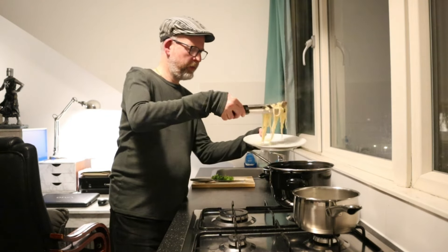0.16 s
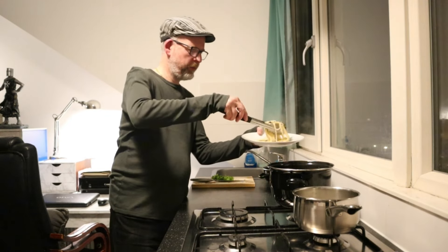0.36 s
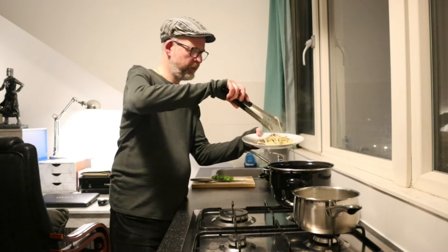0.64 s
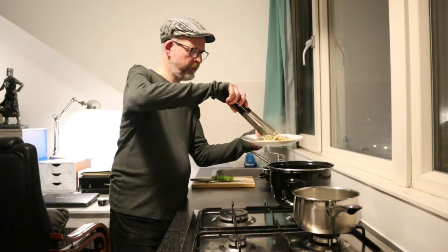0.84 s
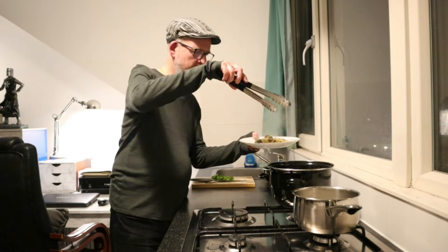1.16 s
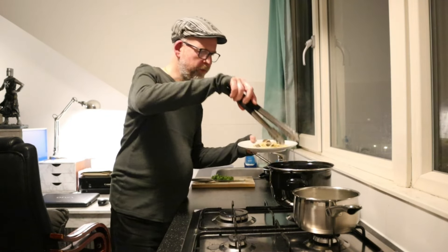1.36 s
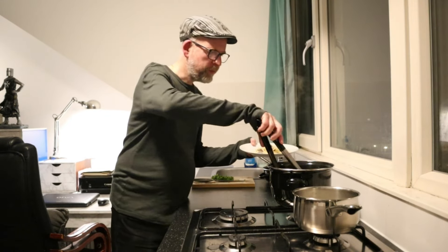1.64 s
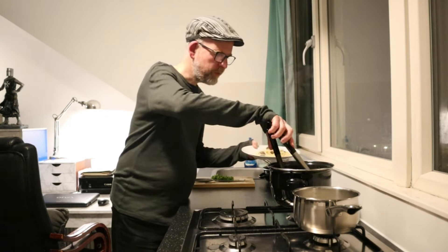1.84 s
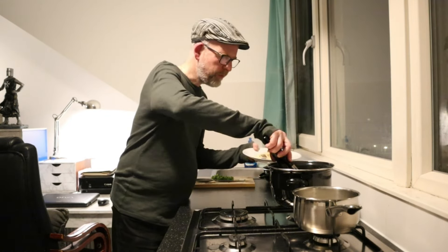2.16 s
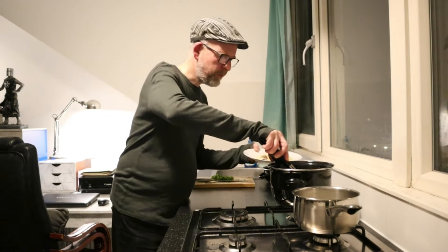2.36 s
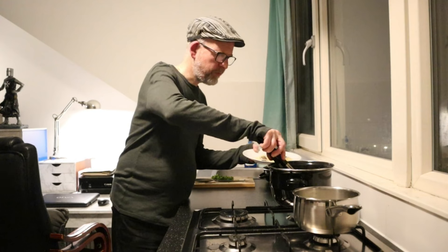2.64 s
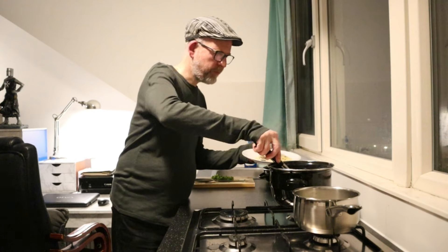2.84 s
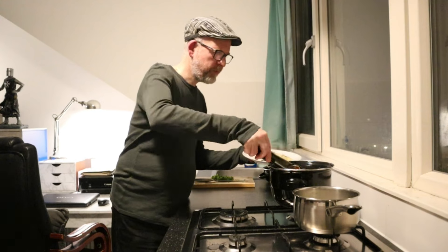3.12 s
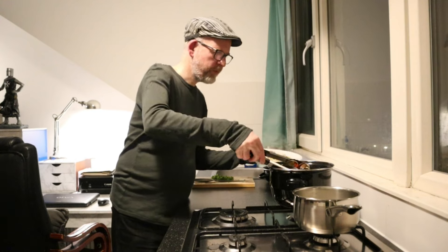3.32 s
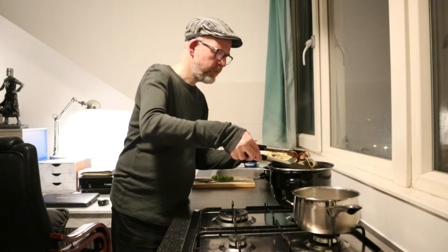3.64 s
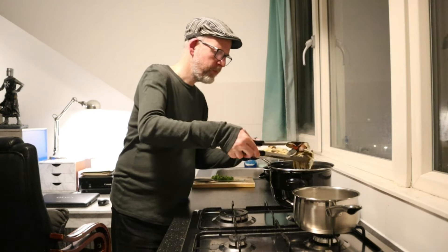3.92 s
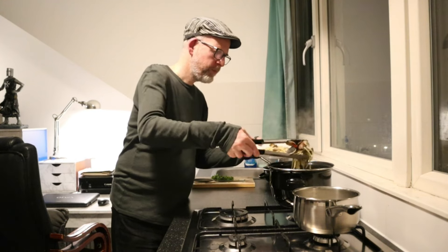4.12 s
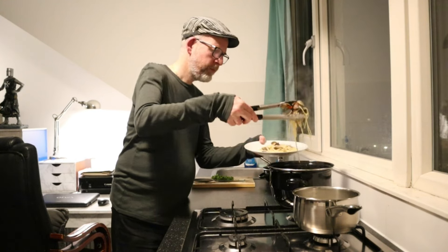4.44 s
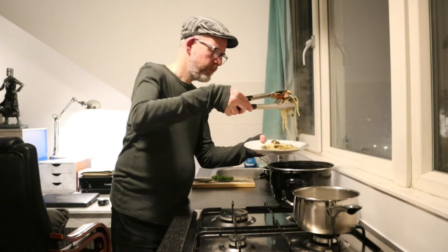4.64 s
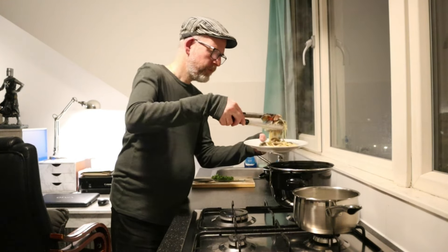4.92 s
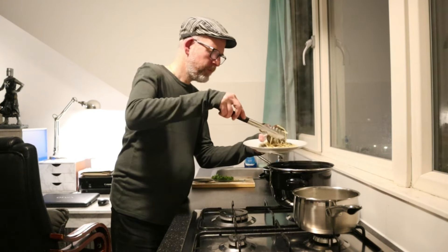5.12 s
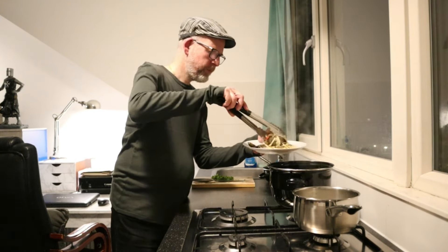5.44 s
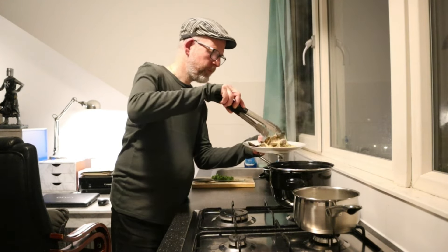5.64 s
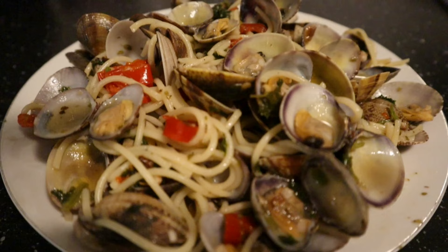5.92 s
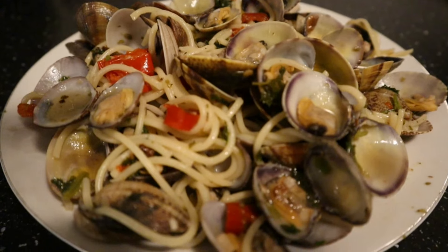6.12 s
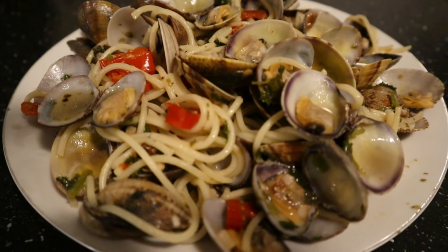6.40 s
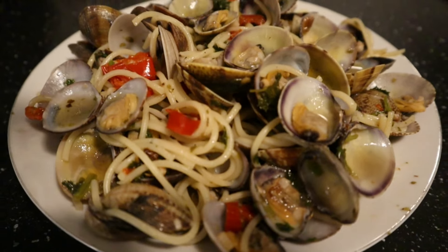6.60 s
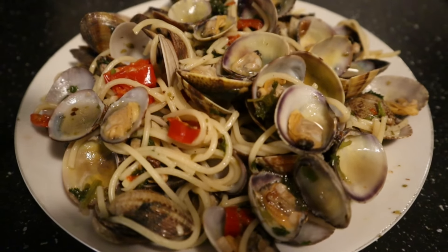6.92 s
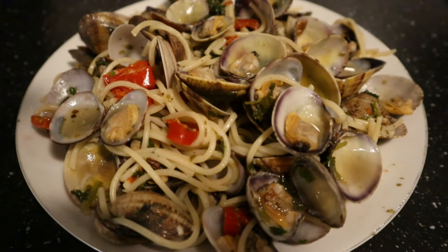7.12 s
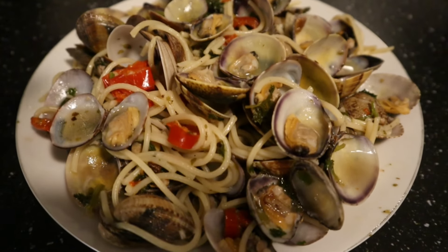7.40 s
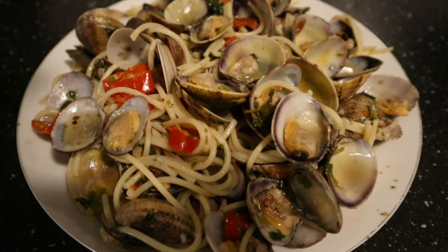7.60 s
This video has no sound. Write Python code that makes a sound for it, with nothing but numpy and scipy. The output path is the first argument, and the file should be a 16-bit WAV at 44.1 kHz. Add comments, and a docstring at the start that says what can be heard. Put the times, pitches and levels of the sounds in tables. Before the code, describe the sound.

In a small live kitchen, tongs and clam shells clink, rattle and scrape between pan and plate, then abruptly only low rumble and a faint whistle.

```python
"""Pasta with clams is served from a pan onto a china plate with steel tongs, in a small kitchen.
First a faint drag and knocks on the plate: struck modes of china and steel, with a noisy crack.
Then jabs into the pan, clacking shells and stirring: short bursts of banded noise, modes and random slips.
A second helping drops and drags on the plate; a limiter ducks the loudest knocks.
After a short silence: low hum and rumble from sines and noise, and one faint, thin, wavering whistle."""
import sys
import numpy as np
from scipy import signal
from scipy.io import wavfile
from scipy.ndimage import uniform_filter1d

SR = 44100
rng = np.random.default_rng(int(sys.argv[2]) if len(sys.argv) > 2 else 0)


def store_pcm(level_fs):
    """Save levels as 16-bit WAV."""
    pcm = np.round(np.clip(level_fs, -1, 1) * 32767).astype(np.int16)
    wavfile.write(sys.argv[1], SR, np.atleast_2d(pcm).T)


N = 341951

# All dB of the serving are relative, ahead of its overall gain, the room and the limiter.
# Tongs and shells knock on the plate. Each row: start in seconds, plate level in dB, place (0 rim, 1 well),
# contact cut-off in Hz, tongs ring in dB, crack in dB.
PLATE_KNOCKS = [(0.491, -24.5, .3, 6000, -52, -25.5), (0.5109, 7.5, 0.18, 9350, -18, -6),
                (0.6959, 8.5, 0.91, 5500, -45, -35), (0.71, -6, 0.68, 3930, -44, -38),
                (0.9149, 9, 0.43, 9500, -12, 4.5), (5.353, -12.5, 0.1, 3020, -22, -13.5),
                (5.3779, -28, 0.1, 9000, -5.5, 0), (5.389, -6, 1, 9000, -13, 6),
                (5.62, -2, 0.89, 8000, -35, -0.5), (5.7382, -11.5, 1, 5030, -23, -7),
                (5.753, -7.5, 0.63, 3000, -16, -9), (5.7652, -13, 0.61, 8000, -25, -3.5),
                (5.849, -14.5, 0.1, 8000, -9.5, -5)]
# Single loud shell clacks. Each row: start in seconds, level in dB, pitch centre in Hz, lift there in dB,
# pan knock in dB.
SHELL_CLACKS = [(1.697, -9.5, 5440, 6, -15), (1.964, -19, 5230, -1, -30), (1.9871, -17, 4820, 0.5, -22),
                (2.029, -17.5, 2220, 14, -19), (2.068, -14.5, 2970, 7, -16), (2.132, -6, 2900, 6.5, -2),
                (2.2162, -12.5, 3100, 2, -35), (2.346, -16, 3370, 3, -15.5), (2.428, -18, 3850, 7, -22),
                (2.6102, -17, 5700, 4.5, -43), (2.671, -21, 5960, 5, -25.5), (2.737, -20.5, 8000, 0, -24),
                (2.877, -17.5, 6200, 1, -48), (2.995, -20, 5600, -11, -52), (3.099, -22.5, 8000, 5, -53),
                (3.201, -21, 7340, 4.5, -58), (3.337, -21.5, 5700, 12.5, -35),
                (3.4035, -10, 990, 18.5, -19), (3.485, -18, 7240, 9, -16), (3.5, -11.5, 6540, 6.5, -20),
                (3.933, -9.5, 6960, 9, -16.5), (4.0481, -28, 6740, 17.5, -28),
                (4.109, -29, 5730, 14, -32.5), (5.017, -30.5, 4100, 6.5, -68), (5.039, -13, 5000, 11, -50),
                (5.0688, -12.5, 3530, 8, -53), (5.2209, -19, 4730, 7.5, -49), (5.2736, -17, 4080, 4.5, -53)]
# Tongs jab into the pan and set shells tumbling. Each row: start in seconds, level in dB, pan knock in dB,
# first gap in seconds.
JABS = [(1.6883, -1, -15, 0.011), (2.1099, -1.5, -21, .0086), (2.454, -2, -14, 0.0084)]
# Steel tips of the tongs snap together. Each row: start in seconds, level in dB.
TIP_SNAPS = [(2.131, -8.5), (3.499, -7), (3.552, -20), (3.9345, -10), (4.113, -18.5), (5.07, -11.5)]
# Tongs tap the rim of the pan. Each row: start in seconds, level in dB.
RIM_TAPS = [(3.498, -6.5), (4.111, -30)]
# Shells grind with a squeal. Each row: start in seconds, end in seconds, level in dB, centre in Hz, width in Hz.
SQUEALS = [(1.975, 2.03, -22, 5100, 500), (2.02, 2.096, -21.5, 2240, 900), (2.945, 3.052, -30, 5700, 800),
           (3.497, 3.524, -21, 5400, 1400), (5.068, 5.115, -11.5, 3430, 1440),
           (5.58, 5.621, -16.5, 6100, 2450), (5.641, 5.687, -24.5, 2000, 547)]
# Effort of the stirring. Each row: time in seconds, effort in dB (only its course counts, not its mean).
STIR_EFFORT = [(1.97, -30), (2.042, -22), (2.154, -27.5), (2.426, -30), (2.734, -33.5), (2.906, -30),
               (3.488, -28.5), (3.52, -34.5)]
# Tongs scrape the floor of the pan. Each row: start in seconds, end in seconds, level at the end in dB.
PAN_SCRAPES = [(2.046, 2.124, -21), (2.682, 2.72, -34), (3.414, 3.512, -34), (3.95, 3.977, -34.5)]
# Tongs drag food over the plate. Each row: start in seconds, end in seconds, level at the end in dB.
PLATE_DRAGS = [(0.016, 0.494, -51), (5.087, 5.102, -16.5), (5.288, 5.448, -21), (5.563, 5.586, -13.5),
               (5.745, 5.778, -39)]
# Faint, thin whistle. Each row: time in seconds, pitch in Hz, level in dB.
WHISTLE = [(6.15, 5134, -69), (6.172, 5368, -48), (6.206, 5490, -45), (6.216, 5600, -56),
           (6.296, 5604, -54), (6.366, 5330, -49), (6.486, 5394, -49.5), (6.62, 5066, -66)]

# Modes of the plate, damped by the food. Each row: pitch in Hz, dB struck at the rim, dB struck in the well,
# t60 in seconds.
PLATE_MODES = [(377, -32.5, -38, .12), (1798, -2, -14, 0.046), (1958, -5, -10.5, 0.032),
               (2744, -5, -10.5, 0.01), (2835, -4, -11.5, 0.035), (3726, -12.5, -16.5, 0.021),
               (4052, -9, -9, 0.044), (4888, -4, -17.5, 0.062), (5670, -52.5, -9.5, 0.097),
               (6184, -4, -14, 0.017), (7460, -39, -12, 0.028), (8000, -19, -23, 0.12),
               (10300, -18.5, -37, 0.34), (12600, -18, -31, .06)]
# Modes of steel tongs, pan and pan rim. Each row: pitch in Hz, level in dB, t60 in seconds.
TONGS_MODES = [(1320, -18, 0.11), (2710, -9.5, 0.17), (3430, -8, 0.1), (4220, -13.5, 0.23),
               (4750, -18, 0.077), (5640, -11, 0.29), (6100, -14, 0.64), (7370, -8, 0.073),
               (7800, -3.5, 0.054), (8500, -4, 0.12), (10600, -29, .1), (10700, -14, 0.21),
               (11820, -12.5, 0.15), (13750, -18, 0.23)]
PAN_MODES = [(170, -18, 0.31), (271, -17.5, 0.42), (341, -22, 0.071), (485, 0, 0.032), (569.4, -11, 0.27),
             (740, -11, 0.036), (907, -17, 0.43), (970, -19.5, 0.044), (1302, -12, 0.17)]
RIM_MODES = [(4810, -4, 0.11), (5160, -2, .1), (5297, 6.5, 0.067), (5696, -1, .12), (6100, -8, 0.15)]

# Spectra of shell, crack on the plate, tip snap, dull pan knock, kitchen air and rumble.
# Each row: frequency in Hz, density in dB per Hz (relative).
SHELL_SPECTRUM = [(100, -22), (300, -24), (600, -17), (1200, -12.5), (2000, -1.5), (3200, -2.5), (5500, 0),
                  (8500, -5.5), (11000, -22), (15500, -13.5)]
CRACK_SPECTRUM = [(50, -22), (200, -30), (400, -11.5), (1200, 4), (2000, 6), (5000, 18.5), (8000, 15.5),
                  (11000, 2.5), (15500, 6)]
TIP_SPECTRUM = [(500, -19), (3000, -2), (6500, 10), (9000, 12), (11500, -5), (13500, -6), (14800, 6),
                (16000, -10)]
THUD_SPECTRUM = [(30, -31), (70, 0), (120, -17), (180, -0.5), (290, -10), (430, 2.5), (650, -6.5),
                 (1100, -4), (2000, -46), (5000, -48)]
AIR_SPECTRUM = [(15, -41), (25, -16), (79, -2), (221, -9), (274, -24), (399, -6.5), (509, -16.5),
                (1900, -20), (2170, -22), (3000, -22.5), (4620, -21.5), (6730, -25), (15500, -30.5)]
RUMBLE_SPECTRUM = [(12, -29), (20, 6), (33, -4), (119, -21.5), (161, -20), (196, -22.5), (382, -22.5),
                   (439, -25), (705, -28), (1270, -32), (2330, -35.5), (4680, -39.5), (15500, -42.5)]
# Swell of the air noise. Each row: time in seconds, gain in dB.
AIR_SWELL = [(0, 5), (.5, 5), (1, 1.5), (4.5, 0), (5, 2), (5.9, -1)]
# Hum tones. Each row: pitch in Hz, rms level in dB.
HUM = [(48.4, -60), (84, -55), (158, -49)]
# Decay of the room. Each row: frequency in Hz, t60 in seconds.
ROOM_T60 = [(100, 0.21), (500, 0.43), (2000, 0.55), (5000, 0.42), (9000, 0.32), (15000, 0.14)]

SERVING_GAIN_DB, AIR_DB, RUMBLE_DB = -5.0, -50, -35.5
BREAK_START_S, BREAK_END_S = 5.933, 5.965
LIMITER_ATTACK_S, CUTOFF_HZ = .012, 15750
MODE_SCATTER_DB = 2.0
TUMBLE_GAP_GROWTH, TUMBLE_LOSS_DB = 1.85, 2.4  # per touch
STIR_MEAN_DB, STIR_FOLLOWS = -30, 1.33  # rattle dB per dB of effort
LOOSE_PER_S, LOOSE_DB = 40, -7.5
PAN_FLOOR_DB = -21.5  # grazing, relative to the stirring level
PRESSED_T60_S = 0.044  # longest pan ring under pressing tongs
DRAG_PRESS_DB, DRAG_ATTACK_DB_PER_S, DRAG_RELEASE_DB_PER_S = 10, 900, 255
WHISTLE_WAVER_HZ = 25  # rms

TIME_S = np.arange(N) / SR
RING_TIME_S = TIME_S[:SR // 3]
EDGES_HZ = np.geomspace(18, 17000, 25)
CENTRES_HZ = np.sqrt(EDGES_HZ[1:] * EDGES_HZ[:-1])
BANK = [signal.butter(2, pair, "band", fs=SR, output="sos") for pair in zip(EDGES_HZ, EDGES_HZ[1:])]


def from_db(db):
    """Decibels to gain."""
    return 10 ** (np.asarray(db) / 20)


def rms_one(x):
    """Scale to rms 1."""
    return x / np.sqrt(np.mean(x ** 2) + 1e-20)


def unit_energy(x):
    """Scale a response so that it passes white noise at the same level."""
    return x / np.sqrt(np.sum(x ** 2) + 1e-20)


def level_curve(rows):
    """Gain over time from rows of (s, dB), silent outside."""
    return from_db(np.interp(TIME_S, *np.transpose(rows), left=-200, right=-200))


def per_band(points):
    """Read a table of (Hz, value) at the band centres, on a log frequency axis."""
    hz, value = np.transpose(points)
    return np.interp(np.log(CENTRES_HZ), np.log(hz), value)


def add(out, start_s, sound):
    """Mix a sound in at its start."""
    at = round(start_s * SR)
    out[at:at + len(sound)] += sound[:N - at]


def noise_bands(size):
    """White noise split into bands; neighbours are unrelated."""
    white = rng.standard_normal((2, size + 4096))  # extra lead-in lets the filters settle
    return np.array([signal.sosfilt(sos, white[k % 2])[-size:] for k, sos in enumerate(BANK)])


def noise(spectrum, size):
    """Coloured noise of rms 1."""
    return rms_one(from_db(per_band(spectrum)) @ noise_bands(size))


def ring(modes, detune):
    """One blow: grip and load split every mode into three close partials of scattered strength."""
    hz, db, t60_s = np.repeat(np.transpose(modes), 3, axis=1)[:, :, None]
    hz = hz * (1 + detune * rng.uniform(-1.13, 1, hz.shape))
    strength = from_db(db + MODE_SCATTER_DB * rng.standard_normal(hz.shape)) / np.sqrt(3)
    phase = 2 * np.pi * (hz * RING_TIME_S + rng.random(hz.shape))
    decay = np.exp(-np.log(1000) * RING_TIME_S / t60_s)
    return np.sum(strength * np.sin(phase) * decay, axis=0)


def clack(spectrum, t60_s, snap_db, snap_s, centre_hz=4000, lift_db=0, octaves=0.34):
    """Snap, then the crowded dying modes of a small hard thing as noise, lifted round its own pitch."""
    t = RING_TIME_S[:SR // 8]
    bands = noise_bands(len(t))
    gains = from_db(per_band(spectrum))
    distance = np.log2(CENTRES_HZ / centre_hz) / octaves
    lift = from_db(lift_db * np.exp(-.5 * distance ** 2))
    body = (gains * lift) @ bands / np.std(gains @ bands)  # level set ahead of the lift
    envelope = from_db(-60 * t / t60_s) + from_db(snap_db) * np.exp(-t / snap_s)
    return np.pad(body * envelope, (0, len(RING_TIME_S) - len(t)))


def rub(responses, per_s, spread_db):
    """Random slips of uneven size, each dealt to one of several responses; rms 1."""
    sizes = from_db(spread_db * np.minimum(rng.exponential(1, N), 3)) * rng.choice([-1, 1], N)
    slips = sizes * (rng.random(N) < per_s / SR)
    dealt = rng.integers(0, len(responses), N)
    return rms_one(sum(signal.oaconvolve(slips * (dealt == k), r)[:N] for k, r in enumerate(responses)))


def drag_pressure(start_s, end_s, end_db):
    """Gain of one drag: quick attack, growing pressure, release."""
    to_go = np.clip((end_s - TIME_S) / (end_s - start_s), 0, 1)
    before_s = np.maximum(start_s - TIME_S, 0)
    after_s = np.maximum(TIME_S - end_s, 0)
    slopes_db = DRAG_ATTACK_DB_PER_S * before_s + DRAG_RELEASE_DB_PER_S * after_s
    return from_db(end_db - DRAG_PRESS_DB * to_go - slopes_db)


def kitchen_air():
    """Coloured noise under the serving, slowly changing in level."""
    return from_db(AIR_DB) * level_curve(AIR_SWELL) * noise(AIR_SPECTRUM, N)


def quiet_room():
    """Rumble and hiss as coloured noise, with hum sines whose phase wanders."""
    out = from_db(RUMBLE_DB) * noise(RUMBLE_SPECTRUM, N)
    for hz, db in HUM:
        wander = np.cumsum(rng.normal(0, 0.008, N))
        out += from_db(db) * np.sqrt(2) * np.sin(2 * np.pi * hz * TIME_S + wander)
    return out


def whistle():
    """One thin sine whose pitch rises, then sinks, with a random waver."""
    s, hz, db = np.transpose(WHISTLE)
    waver_hz = WHISTLE_WAVER_HZ * rms_one(uniform_filter1d(rng.standard_normal(N), size=150))
    phase = 2 * np.pi * np.cumsum(np.interp(TIME_S, s, hz) + waver_hz) / SR
    return level_curve(np.column_stack([s, db])) * np.sqrt(2) * np.sin(phase)


def kitchen(x, echo_db=-3, echo_s=0.0093, echo_spread_s=0.0018, tail_db=0, build_s=0.00083):
    """Wall and window return a cluster of early echoes; a diffuse tail dies at its own rate in each band."""
    t = TIME_S[:SR]
    cluster = np.exp(-.5 * ((t - echo_s) / echo_spread_s) ** 2)
    echoes = rng.standard_normal(SR) * (rng.random(SR) < 3000 / SR) * cluster
    dying = from_db(-60 * t / per_band(ROOM_T60)[:, None])
    tail = np.sum(noise_bands(SR) * dying, axis=0) * (1 - np.exp(-t / build_s))
    response = from_db(echo_db) * unit_energy(echoes) + from_db(tail_db) * unit_energy(tail)
    return x + signal.oaconvolve(x, response)[:N]


def squeals():
    """Fast slips drive one broad resonance of a shell."""
    out = np.zeros(N)
    for start_s, end_s, db, hz, width_hz in SQUEALS:
        size = max(round((end_s - start_s) * SR), 64)
        slips = (rng.standard_normal(N) * (rng.random(N) < 2500 / SR))[:size]
        band = signal.butter(2, [hz - width_hz / 2, hz + width_hz / 2], "band", fs=SR, output="sos")
        squeal = rms_one(signal.sosfilt(band, slips)) * signal.windows.tukey(size, .3)
        add(out, start_s, from_db(db) * squeal)
    return out


def pan_knock():
    """The loaded pan gives a dull thud with a little ring."""
    thud = clack(THUD_SPECTRUM, t60_s=.07, snap_db=-6, snap_s=.004)
    return from_db(-5) * ring(PAN_MODES, detune=.03) + from_db(-8) * thud


def pan_grinding(count):
    """Steel sticks and slips on the pan floor, whose modes are damped by the pressure; rms 1."""
    modes = [(hz, db, min(t60_s, PRESSED_T60_S)) for hz, db, t60_s in PAN_MODES]
    responses = []
    for _ in range(count):
        pan = unit_energy(ring(modes, detune=0.042))
        thud = unit_energy(clack(THUD_SPECTRUM, t60_s=0.05, snap_db=-8, snap_s=0.0044))
        responses.append(pan + from_db(-4) * thud)
    return rub(responses, per_s=250, spread_db=1.5)


def shell_ticks(count):
    """Short ticks of shells of many sizes, each of unit energy."""
    return [unit_energy(clack(SHELL_SPECTRUM, t60_s=0.024, snap_db=5.5, snap_s=0.0039,
                              centre_hz=hz, lift_db=12.0)) for hz in np.geomspace(2900, 8000, count)]


def stirring():
    """Shells tumble, loose ones tick and tongs graze the pan, all with the effort; hard scrapes are added."""
    ticks = shell_ticks(count=9)
    touches = [tick + from_db(-17) * unit_energy(pan_knock()) for tick in ticks]
    rattle = rub(touches, per_s=300, spread_db=4.5)
    loose = from_db(LOOSE_DB) * rub(ticks[::2], per_s=LOOSE_PER_S, spread_db=2.5)
    s, db = np.transpose(STIR_EFFORT)
    effort = level_curve(np.column_stack([s, STIR_MEAN_DB + STIR_FOLLOWS * (db - db.mean())]))
    pressure = from_db(PAN_FLOOR_DB) * effort + sum(drag_pressure(*row) for row in PAN_SCRAPES)
    return effort * (rattle + loose) + pressure * pan_grinding(count=4)


def dragging():
    """Steel and shells stick and slip on the glaze, shaking plate and tongs."""
    well_modes = [(hz, well_db, t60_s) for hz, rim_db, well_db, t60_s in PLATE_MODES]
    responses = []
    for tick in shell_ticks(count=8):
        plate = unit_energy(ring(well_modes, detune=.06))
        tongs = unit_energy(ring(TONGS_MODES, detune=.045))
        responses.append(tick + from_db(-19) * plate + from_db(1) * tongs)
    pressure = sum(drag_pressure(*row) for row in PLATE_DRAGS)
    return pressure * rub(responses, per_s=2200, spread_db=6.0)


def shell_clack(centre_hz, lift_db):
    """One shell strikes another: a noise burst lifted round its pitch."""
    return clack(SHELL_SPECTRUM, t60_s=0.045, snap_db=-5, snap_s=0.002, centre_hz=centre_hz, lift_db=lift_db)


def jabs(count):
    """Each jab starts a run of ever weaker, sparser touches on shells of random size, over pan knocks."""
    out = np.zeros(N)
    for touch_s, db, pan_db, gap_s in JABS:
        for k in range(count):
            shell = from_db(db) * shell_clack(centre_hz=rng.uniform(2100, 4400), lift_db=-1.5)
            touch = shell + from_db(pan_db) * pan_knock()
            add(out, touch_s, from_db(-TUMBLE_LOSS_DB * k) * touch)
            touch_s = touch_s + gap_s * TUMBLE_GAP_GROWTH ** k
    return out


def shell_clacks():
    """Shells clack with the pan knocking under them."""
    out = np.zeros(N)
    for start_s, db, centre_hz, lift_db, pan_db in SHELL_CLACKS:
        shell = from_db(db) * shell_clack(centre_hz, lift_db)
        add(out, start_s, shell + from_db(pan_db) * pan_knock())
    return out


def tong_snaps_and_taps():
    """Tongs snap shut as bright noise bursts and tap the rim, which rings in its modes."""
    out = np.zeros(N)
    for start_s, db in TIP_SNAPS:
        add(out, start_s, from_db(db) * clack(TIP_SPECTRUM, t60_s=0.085, snap_db=-14.5, snap_s=0.00036))
    for start_s, db in RIM_TAPS:
        add(out, start_s, from_db(db) * ring(RIM_MODES, detune=.02))
    return out


def plate_knocks():
    """The place of the blow weights the plate modes; a soft contact leaves out the high ones."""
    out = np.zeros(N)
    hz, rim_db, well_db, t60_s = np.transpose(PLATE_MODES)
    for start_s, db, place, contact_hz, tongs_db, crack_db in PLATE_KNOCKS:
        place_db = rim_db + np.clip(place, 0, 1) * (well_db - rim_db)
        mode_db = place_db - 10 * np.log10(1 + (hz / contact_hz) ** 4)
        plate = ring(np.column_stack([hz, mode_db, t60_s]), detune=.016)
        tongs = ring(TONGS_MODES, detune=.005)
        crack = clack(CRACK_SPECTRUM, t60_s=0.041, snap_db=-36.0, snap_s=0.0045)
        add(out, start_s, from_db(db) * plate + from_db(tongs_db) * tongs + from_db(crack_db) * crack)
    return out


def scene():
    """The serving, a short silence, then the quiet room; both channels alike."""
    struck = plate_knocks() + jabs(count=5) + shell_clacks() + tong_snaps_and_taps()
    rubbed = stirring() + dragging() + squeals()
    serving = from_db(SERVING_GAIN_DB) * kitchen(struck + rubbed) + kitchen_air()
    after = quiet_room() + whistle()
    mono = serving * (TIME_S < BREAK_START_S) + after * (TIME_S > BREAK_END_S)
    return np.array([mono, mono])


def record(dry, threshold_db=-3, release_db_per_s=100, top=1.0):
    """A limiter ducks just after loud peaks and recovers steadily; the rest is soft-clipped, the top cut."""
    over_db = np.maximum(20 * np.log10(np.abs(dry[0]) + 1e-9) - threshold_db, 0)
    release_db = release_db_per_s * TIME_S
    held_db = np.maximum.accumulate(over_db + release_db) - release_db
    pole = np.exp(-1 / (LIMITER_ATTACK_S * SR))
    limited = dry * from_db(-signal.lfilter([1 - pole], [1, -pole], held_db))
    clipped = top * np.tanh(limited / top)
    return signal.sosfilt(signal.ellip(14, .1, 70, CUTOFF_HZ, fs=SR, output="sos"), clipped)


dry = scene()
out = record(dry)
store_pcm(out)
```